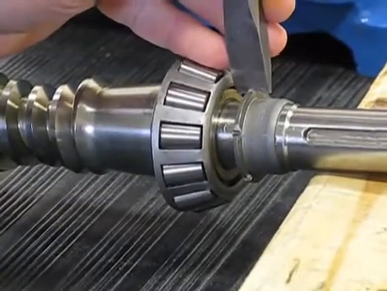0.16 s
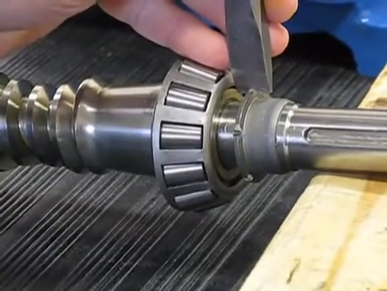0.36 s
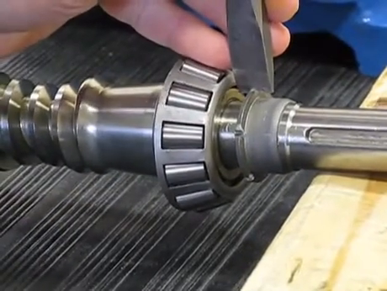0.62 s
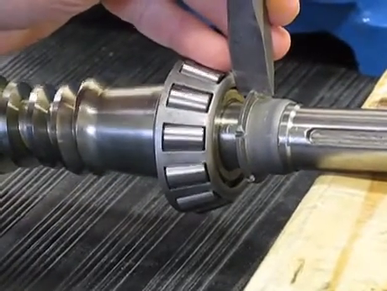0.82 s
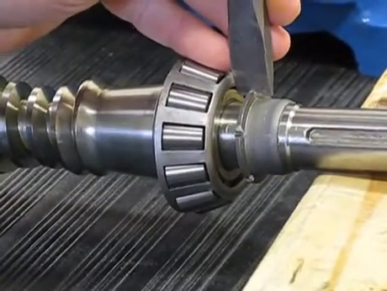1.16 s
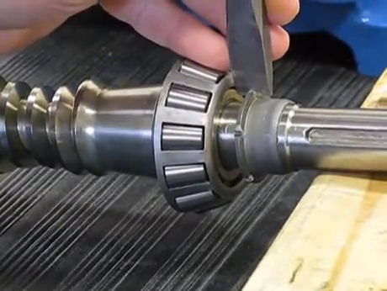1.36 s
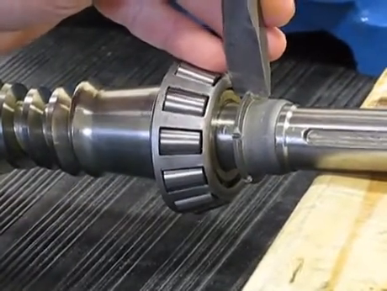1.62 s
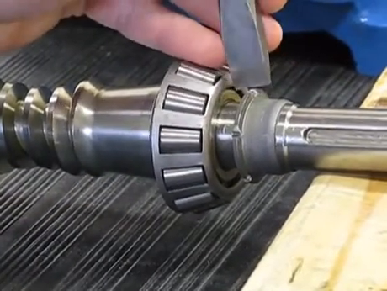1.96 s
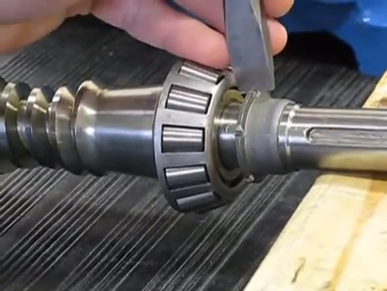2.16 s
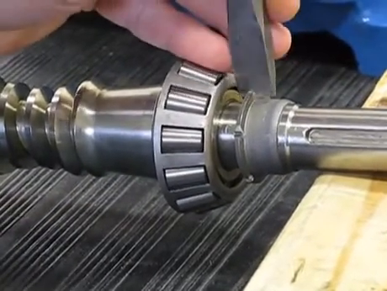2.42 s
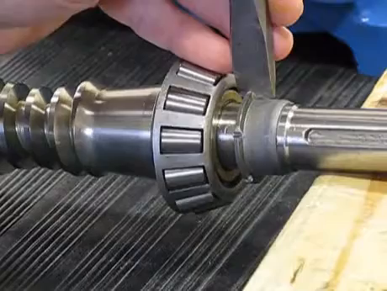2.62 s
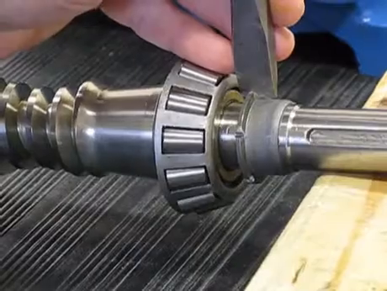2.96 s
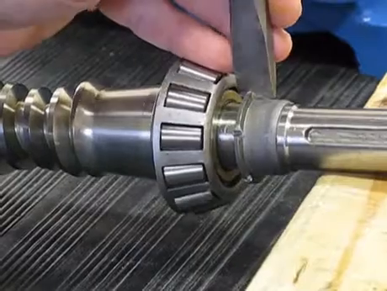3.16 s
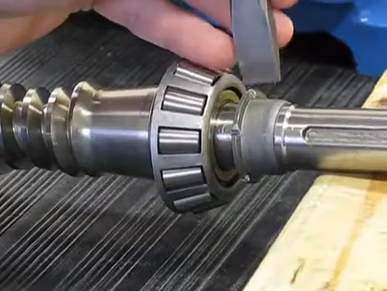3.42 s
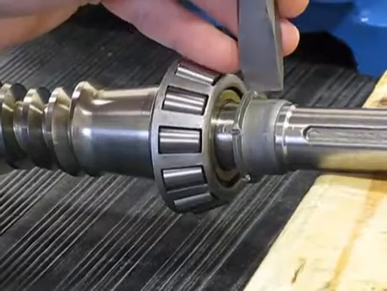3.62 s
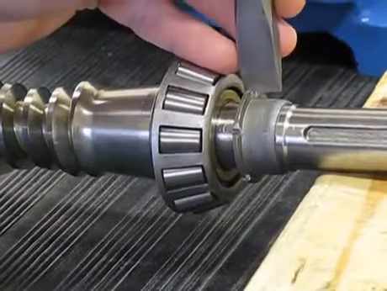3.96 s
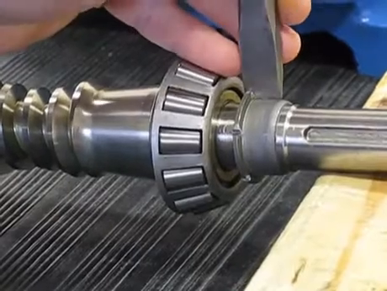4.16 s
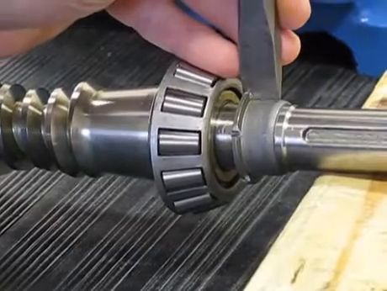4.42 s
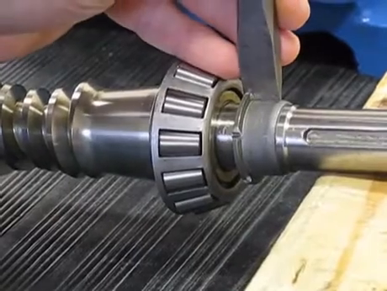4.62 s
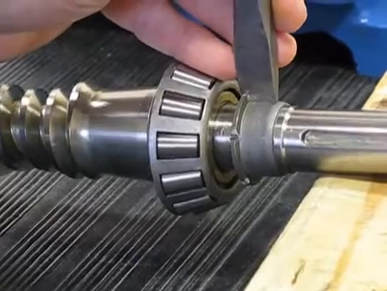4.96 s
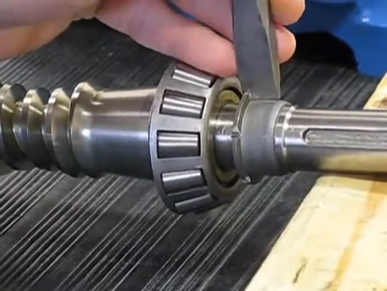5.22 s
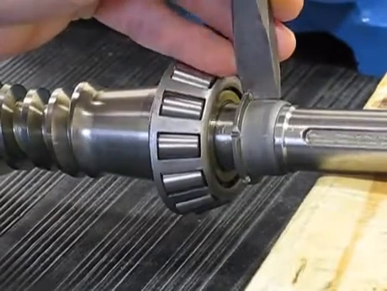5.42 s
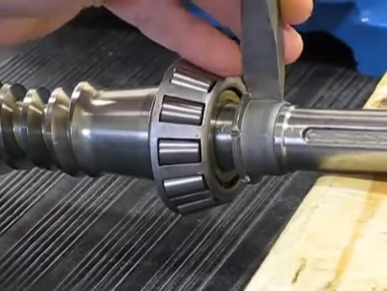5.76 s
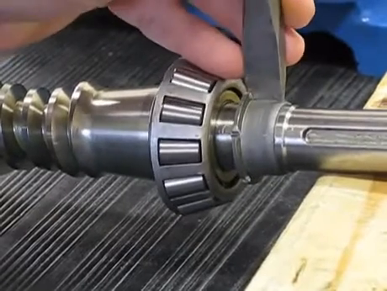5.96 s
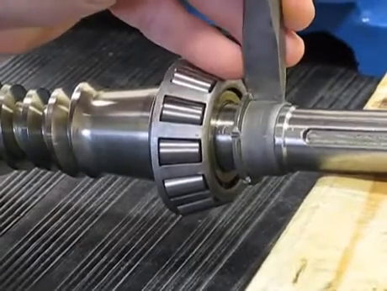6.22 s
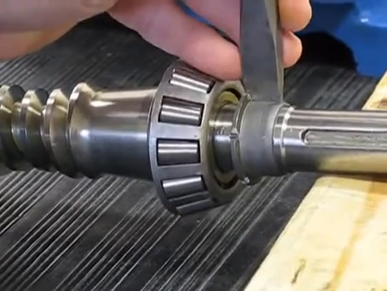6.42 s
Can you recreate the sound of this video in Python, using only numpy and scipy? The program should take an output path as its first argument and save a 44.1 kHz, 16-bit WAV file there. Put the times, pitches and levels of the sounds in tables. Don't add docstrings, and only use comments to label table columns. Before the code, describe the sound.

A hammer strikes a chisel against a steel ring nut in five hard ringing blows, with lighter taps between, in a humming, echoing workshop.

```python
import sys
import numpy as np
from scipy import signal
from scipy.io import wavfile
from scipy.ndimage import uniform_filter1d

SR = 44100
rng = np.random.default_rng(int(sys.argv[2]) if len(sys.argv) > 2 else 0)


def convert_level_to_amplitude(level_db):
    exponent = np.asarray(level_db, float) / 20
    return 10 ** exponent


def wav_out(sig):
    wavfile.write(sys.argv[1], SR, np.round(np.clip(np.atleast_2d(sig).T, -1, 1) * 32767).astype(np.int16))


N = 291060


def at_hz(points, hz):
    table_hz, table_db = np.array(points)[:, 0], np.array(points)[:, 1]
    return np.interp(np.log(hz), np.log(table_hz), table_db)


def rms_one(x):
    return x / np.sqrt(np.mean(x ** 2) + 1e-20)


def noise():
    return rng.standard_normal(N)


def filtered(x, order, hz, kind="low"):
    return signal.sosfilt(signal.butter(order, hz, kind, fs=SR, output="sos"), x)


def drift(rate_hz):
    pole = np.exp(-80 * np.pi * rate_hz / SR)
    steps = rng.standard_normal(N // 40 + 2002)
    slow = signal.lfilter([1], [1, -2 * pole, pole * pole], steps)[2000:]
    return np.interp(np.arange(N) / 40, np.arange(len(slow)), rms_one(slow))


def bands(length):
    white = rng.standard_normal((2, length))
    edges = 22 * 2 ** np.arange(0, 9.1, 1 / 3)
    for k, (low, high) in enumerate(zip(edges, edges[1:])):
        yield np.sqrt(low * high), filtered(white[k % 2], 2, [low, high], "band")


def modes(table, t, spread_db):
    out = np.zeros(len(t))
    for (hz, level_db, t60), luck in zip(table, rng.standard_normal(len(table))):
        alive = t[:int(1.5 * t60 * SR)]
        envelope = convert_level_to_amplitude(level_db + spread_db * luck - 60 * alive / t60)
        out[:len(alive)] += envelope * np.sin(2 * np.pi * hz * alive)
    return out


# (time [s], strength [dB], bench thud [dB], crack pitch [Hz], crack [dB])
BLOWS = [
    (0.2385, 13.5, -4.1, 4330, 0),
    (.9690, 13.5, -2.5, 5390, -6.5),
    (1.689, 13, -3.1, 3440, -7),
    (3.2765, 14, -0.5, 4430, -0.5),
    (5.1440, 13.5, -3, 3470, -2),
]
# (frequency [Hz], level [dB], t60 [s])
BENCH_MODES = [(298, -18, 0.14), (352, -26, 0.05), (436, -5, 0.2), (466, -16, .14), (495, -7, 0.11),
               (548, -7, 0.06), (692, -13, 0.1), (809, -11, 0.13), (882, -16, .12)]
# (frequency [Hz], level [dB], t60 [s])
SHAFT_MODES = [(310, -32.5, 3.8), (455.8, -25, 3.14), (465, -26, 3.27)]
# (frequency [Hz], level [dB], t60 [s])
STEEL_MODES = [(1010, -26, .15), (1174, -22, 0.15), (1347, -20, 0.2), (1670, -35, 0.14), (1755, -19, 0.12),
               (2064, -24, 0.13), (2280, -21, 0.18), (2420, -24, 0.15), (2838, -18, 0.22), (2935, -23, 0.2),
               (3172, -23, 0.2), (3500, -23, .08), (4400, -17, 0.04), (5280, -22, 0.03)]


def blows():
    feed, t = np.zeros(N), np.arange(N) / SR
    near = convert_level_to_amplitude(12) * modes(SHAFT_MODES, t + .5, spread_db=6.0)
    for s, strength_db, thud_db, crack_hz, crack_db in BLOWS:
        i = round(s * SR)
        u = t[:N - i]
        crack = convert_level_to_amplitude(-5 + crack_db) * np.sin(2 * np.pi * crack_hz * u)
        crack *= (1 - np.exp(-u / .001)) * np.exp(-u / .004)
        shaken = filtered(noise()[:N - i], 2, 5000)
        rattle = convert_level_to_amplitude(-3) * shaken * (1 - np.exp(-u / .0035)) * np.exp(-u / 0.019)
        steel = modes(STEEL_MODES, u, spread_db=0.5) * (1 - np.exp(-u / 0.0016))
        thud = convert_level_to_amplitude(thud_db) * modes(BENCH_MODES, u - .005, spread_db=1.5) * (1 - np.exp(-(u / .004) ** 2))
        shaft = modes(SHAFT_MODES, u, spread_db=1.0)
        near[i:] += convert_level_to_amplitude(strength_db) * (crack + rattle + steel + thud + shaft)
        click = convert_level_to_amplitude(14) * np.exp(-((u - .0006) / .00005) ** 2)
        spread = click + 0.15 * crack + convert_level_to_amplitude(-7) * rattle + convert_level_to_amplitude(-19) * steel + convert_level_to_amplitude(-26.5) * thud
        feed[i:] += convert_level_to_amplitude(strength_db) * spread
    return near, feed


# (time [s], strength [dB], crack pitch [Hz], chisel ring [dB], thud [dB])
TAPS = [
    (2.8325, 3, 2840, -4, -7),
    (4.6364, 2.6, 3280, -5, -10),
    (5.6704, -19, 4300, 1, -28),
]
# (frequency [Hz], level [dB], t60 [s])
TAP_THUD_MODES = [(434, -25, 0.08), (460, -7.5, 0.064), (515, 1, 0.049), (600, -10, 0.027), (725, -26, .08),
                  (883, -6.5, 0.13)]
# (frequency [Hz], level [dB], t60 [s])
TAP_RING_MODES = [(4060, 3, 0.015), (4360, 5.5, 0.023), (5400, -10.5, 0.017), (6500, -13, 0.022),
                  (2180, -4, .014), (1500, -5, .012)]


def taps():
    near, feed, t = np.zeros(N), np.zeros(N), np.arange(N) / SR
    for s, strength_db, crack_hz, ring_db, thud_db in TAPS:
        i = round(s * SR)
        u = t[:N - i]
        turn = 2 * np.pi * crack_hz * u
        crack = 1.1 * (np.sin(turn) + 0.33 * np.cos(2 * turn)) * np.exp(-((u - .001) / 0.00049) ** 2)
        ring = convert_level_to_amplitude(ring_db) * modes(TAP_RING_MODES, u, spread_db=1.0) * (1 - np.exp(-(u / .002) ** 2))
        thud = convert_level_to_amplitude(thud_db) * modes(TAP_THUD_MODES, u - .0045, spread_db=.3)
        thud *= 1 - np.exp(-(u / .0022) ** 2)
        snap = convert_level_to_amplitude(-2.5) * np.sin(2 * np.pi * 1680 * u) * np.exp(-((u - .0015) / 0.0004) ** 2)
        push = -convert_level_to_amplitude(thud_db - 7.5) * np.exp(-((u - .002) / 0.0025) ** 2)
        shaft = convert_level_to_amplitude(-3) * modes(SHAFT_MODES, u, spread_db=7)
        near[i:] += convert_level_to_amplitude(strength_db) * (crack + snap + ring + thud + push + shaft)
        click = np.exp(-((u - .001) / 0.00039) ** 2) - 0.28 * np.exp(-((u - .0015) / .001) ** 2)
        tick = convert_level_to_amplitude(10) * np.exp(-((u - .001) / .00003) ** 2)
        spread = convert_level_to_amplitude(-22) * (crack + convert_level_to_amplitude(-12) * ring) + convert_level_to_amplitude(1.5) * click + tick
        spread += convert_level_to_amplitude(-20) * thud * np.exp(-u / 0.017)
        feed[i:] += convert_level_to_amplitude(strength_db) * spread
    return near, feed


EARLIER_BLOW_S = -0.44
# (frequency [Hz], t60 [s])
HALL_T60 = [(100, 0.52), (400, 0.82), (1000, 1.165), (2500, 1.39), (5000, 1.285), (8000, 1.5)]
# (frequency [Hz], level [dB])
HALL_COLOUR = [(60, -28), (130, -2.5), (260, -5), (450, 0), (800, 0.5), (1300, -5.5), (2400, -1.5),
               (3300, -4.5), (4500, -5.5), (6000, -14), (9000, -23.5)]


def hall(feed):
    t = np.arange(2 * SR) / SR
    echoes = np.zeros(len(t))
    for hz, band in bands(len(t)):
        decay = convert_level_to_amplitude(at_hz(HALL_COLOUR, hz) - 60 * t / at_hz(HALL_T60, hz))
        echoes += band * decay * (1 - np.exp(-t * hz / 4.3))
    out = signal.fftconvolve(feed, echoes * (1 - np.exp(-t / 0.003)))[:N]
    late = echoes[round(-EARLIER_BLOW_S * SR):]
    out[:len(late)] += convert_level_to_amplitude(36) * late
    return convert_level_to_amplitude(-23) * out


# (frequency [Hz], rms level [dB])
HUM = [(118.4, -40), (209.9, -36), (360.7, -34), (419.9, -36.5), (786.0, -30.5), (1077, -60), (1572, -38),
       (1852, -43), (2331, -37), (2363, -45.5), (2449, -43.5), (2536, -49)]
# (frequency [Hz], level [dB per Hz])
HISS = [(25, -11), (60, -14.5), (120, -7), (200, -8.5), (350, -2.5), (500, -5), (800, -4.5), (1500, -3),
        (2500, -5), (3900, -6.5), (5000, -24.5), (6500, -25.5), (8000, -48), (11000, -48)]


def machines():
    t, together = np.arange(N) / SR, drift(0.61)
    hiss, tones = np.zeros(N), np.zeros(N)
    for hz, band in bands(N):
        hiss += band * convert_level_to_amplitude(at_hz(HISS, hz) + 0.49 * together + 1.23 * drift(4.9))
    for hz, level_db in HUM:
        level = convert_level_to_amplitude(level_db + 6.5 + 1.6 * drift(3))
        tones += level * np.sin(2 * np.pi * hz * t + .7 * drift(1.5) + 6 * rng.random())
    return convert_level_to_amplitude(-19.5) * rms_one(hiss) + tones


def rumble():
    start_s, rise_s, hold_s, fade_s = 0.53, 0.12, .35, .12
    low = filtered(noise(), 2, [70, 170], "band")
    u = np.arange(N) / SR - start_s
    fade = np.exp(-np.maximum(u - rise_s - hold_s, 0) / fade_s)
    return convert_level_to_amplitude(-29) * rms_one(low) * np.clip(u / rise_s, 0, 1) ** 2 * fade


def scene():
    hard, hard_feed = blows()
    light, light_feed = taps()
    echo = hall(hard_feed + light_feed)
    return (hard + light + echo + machines() + rumble())[None]


# (sudden share of the dive [0-1], dive [s], hold [s], depth against a blow's [ratio])
TAP_DIVES = [
    (0.49, 0.17, 0.26, 1.02),
    (0.603, 0.036, 0.25, 1.18),
]


def gain_control():
    floor_db, full_db, sudden_s, recover_s = -15.5, 0.22, 0.01, 0.22
    t, depth = np.arange(N) / SR, np.ones(N)
    blow_times = [EARLIER_BLOW_S] + [blow[0] for blow in BLOWS]
    dives = [(s, 0, 0.07, 0.44, 1) for s in blow_times]
    dives += [(tap[0], *dive) for tap, dive in zip(TAPS, TAP_DIVES)]
    for s, sudden, dive_s, hold_s, deepest in sorted(dives):
        i = max(round(s * SR), 0)
        u = t[i:] - s
        left = sudden * np.exp(-u / sudden_s) + (1 - sudden) * np.exp(-u / dive_s)
        easing = np.maximum(u - hold_s, 0) / recover_s
        depth[i:] = (deepest - (deepest - depth[i]) * left) * (1 + easing) * np.exp(-easing)
    return convert_level_to_amplitude(full_db + (floor_db - full_db) * depth)


def overload(x, knee):
    return x / (1 + np.abs(x) ** knee) ** (1 / knee)


# (start [s], end [s], kept below [Hz])
DULL_MOMENTS = [
    (.229, .238, 4500),
    (.945, .964, 5000),
    (1.674, 1.682, 4000),
    (3.254, 3.27, 2200),
    (5.118, 5.136, 5000),
]


def dull_before_attacks(x):
    out = x.copy()
    for start, end, keep_hz in DULL_MOMENTS:
        near = np.arange(round((start - .02) * SR), round((end + .02) * SR))
        dull = signal.sosfiltfilt(signal.butter(6, keep_hz, fs=SR, output="sos"), x[:, near])
        share = np.interp(near / SR, [start - .003, start, end, end + .003], [0, 1, 1, 0])
        out[:, near] += share * (dull - x[:, near])
    return out


# (low edge, high edge) [Hz]
SELF_NOISE_HZ = [4300, 7500]


def roll_off(x):
    return signal.sosfilt(signal.butter(12, 15800, fs=SR, output="sos"), x)


def record(dry):
    knee, treble_cut_hz = 8.0, 7750
    loud = dry * gain_control() - 0.023
    loud = loud + convert_level_to_amplitude(-56) * rms_one(filtered(noise(), 2, SELF_NOISE_HZ, "band"))
    cut = overload(loud, knee)
    full = signal.sosfilt(signal.cheby2(8, 60, treble_cut_hz * 1.154, fs=SR, output="sos"), cut)
    swell = 1 + 16.7 * uniform_filter1d(cut ** 2, size=600)
    full += swell * convert_level_to_amplitude(-24 + 2 * drift(16)) * filtered(cut, 4, [7300, 9000], "band")
    full = overload(dull_before_attacks(full), 2 * knee)
    full = signal.sosfilt(signal.cheby2(12, 70, 15800, fs=SR, output="sos"), full)
    return roll_off(full)


dry = scene()
out = record(dry)
wav_out(out)
```